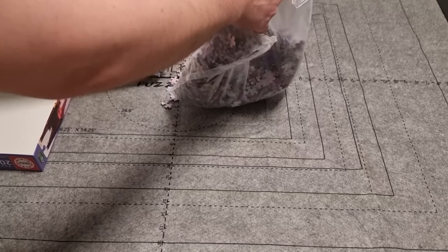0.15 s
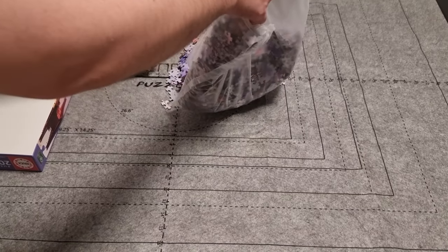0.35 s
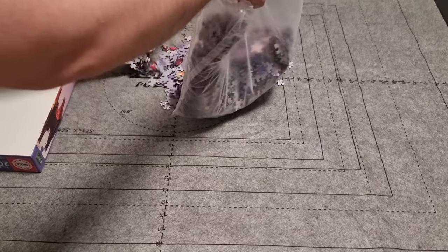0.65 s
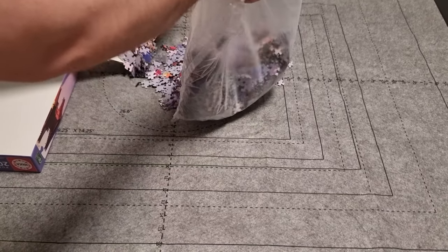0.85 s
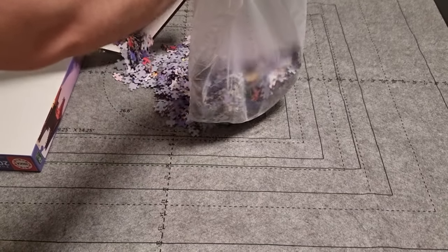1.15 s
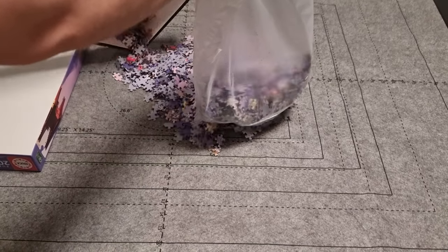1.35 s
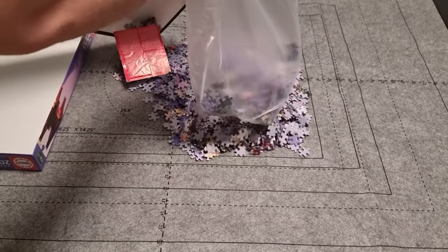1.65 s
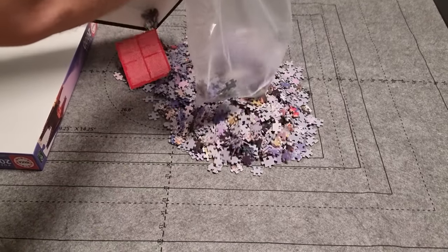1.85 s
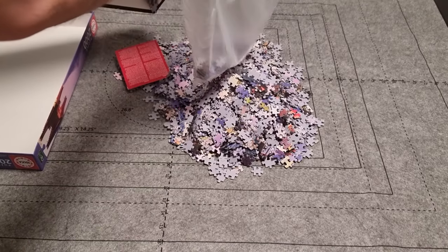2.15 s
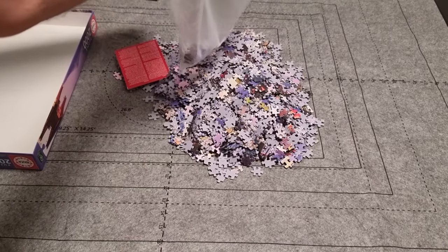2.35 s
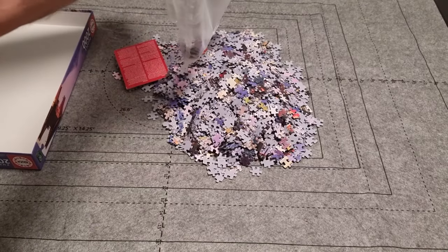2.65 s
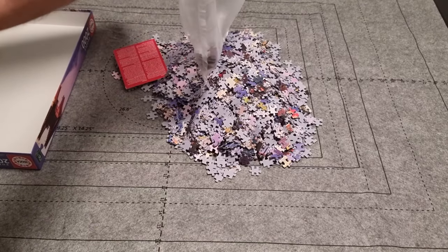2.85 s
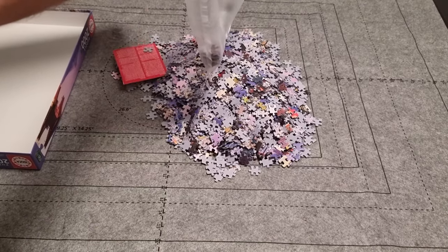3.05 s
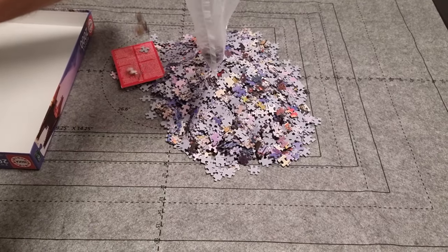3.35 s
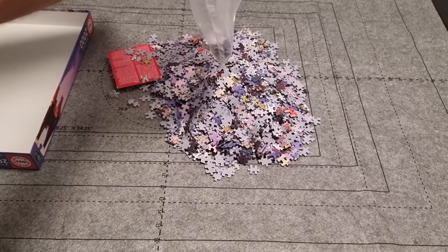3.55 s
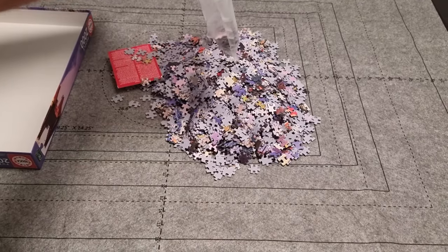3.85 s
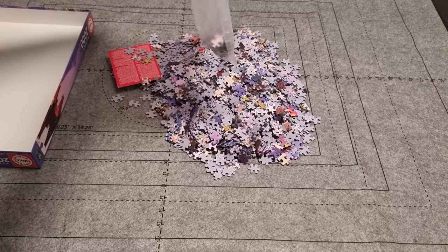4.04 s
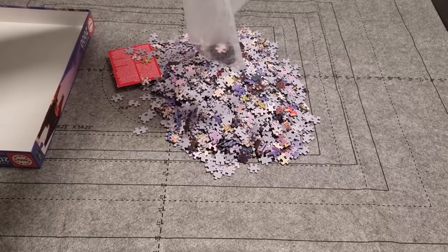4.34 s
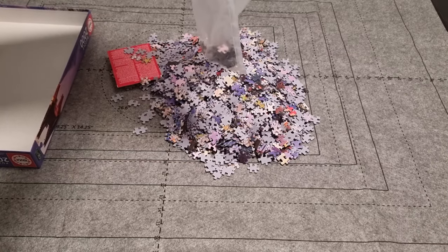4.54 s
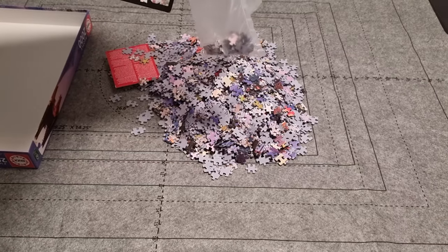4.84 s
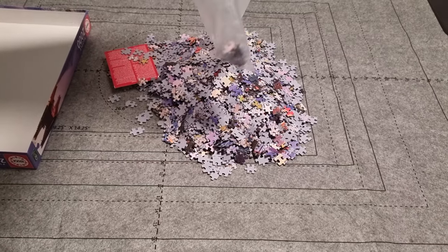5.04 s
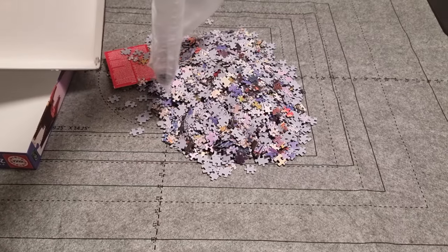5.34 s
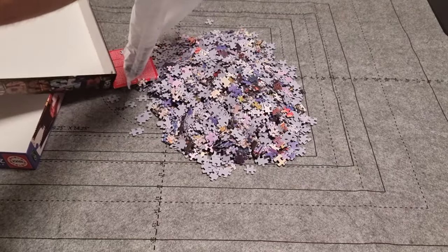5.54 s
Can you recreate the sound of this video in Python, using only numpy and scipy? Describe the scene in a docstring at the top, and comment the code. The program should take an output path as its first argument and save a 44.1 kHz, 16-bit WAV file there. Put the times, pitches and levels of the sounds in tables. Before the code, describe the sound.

Cardboard puzzle pieces pour from a crinkling plastic bag onto felt in a dense rattle, some clattering on a plastic case, ending with a hard box knock.

```python
"""Cardboard jigsaw pieces pour from a thin plastic bag onto a felt mat on a table: streams of random grains.
The jerked film crinkles and snaps in short ticks. Left of the spaced pair of microphones, a plastic case
slides out of the puzzle box early on, rings under tumbling pieces midway, and the empty box lands hard at
the end; case and box are struck resonances. Two dull drops knock on mat and pile. The small room adds a
decaying noise echo, a steady sine hum, a brief deeper drone and faint shaped noise."""
import sys
import numpy as np
from scipy import signal
from scipy.fft import rfft, irfft, next_fast_len
from scipy.io import wavfile
from scipy.ndimage import map_coordinates

SR = 44100
rng = np.random.default_rng(int(sys.argv[2]) if len(sys.argv) > 2 else 0)


def transcribe(signal):
    """Save signal, clipped to [-1, 1], as a 16-bit WAV file at the path in sys.argv[1]."""
    frames = np.atleast_2d(signal).T
    limited = np.clip(frames, -1, 1)
    pcm = np.round(limited * 32767).astype(np.int16)
    wavfile.write(sys.argv[1], SR, pcm)


N = 251370  # length [samples]

# Source levels are relative: each source adds its own offset, and the mix and room come after.
# the bag is lifted, empties, then gives up a second lot: (time [s], tumbling level [dB], crinkle level [dB])
POUR_LEVELS = [(0, -42.5, -46.5), (0.17, -47, -55), (0.56, -44, -50.5), (0.69, -40.5, -48.5),
               (1.1, -40, -50), (1.42, -44.5, -51.5), (1.75, -42, -53.5), (1.85, -47, -55),
               (2.28, -54, -64), (2.56, -56.5, -67), (2.79, -47.5, -60), (3.38, -44.5, -61),
               (3.55, -43, -46), (3.7, -47, -55), (4.08, -46, -55), (4.36, -50, -56), (4.58, -58.5, -87),
               (5.35, -70, -84)]
# the sagging bag is jerked: (time [s], tumbling level [dB], crinkle level [dB])
BAG_JERKS = [(0.695, -35.5, -48), (1.93, -41.5, -52), (4.404, -39, -49.5), (4.67, -54.5, -81),
             (4.767, -44.5, -63), (5.106, -46, -70), (5.425, -55, -90), (5.53, -61.5, -87)]
# the film buckles: (time [s], peak level [dB], treble share [dB])
FILM_SNAPS = [(0.12, -37, -13), (0.2657, -31, -16), (0.5096, -34, -27), (0.57, -28, -13), (0.5825, -34, -9),
              (1.0896, -28, -22), (1.1148, -34, -12), (1.479, -27.5, -23), (2.0965, -30.5, -19),
              (2.3527, -45, -7), (2.4073, -38, -13), (2.82, -27.5, -16), (2.982, -37, -12),
              (3.21, -31, -14), (3.6264, -25.5, -15.5), (3.7965, -25, -10), (3.925, -31, -13.5),
              (4.085, -26.5, -12), (4.1587, -31.5, -17), (4.1957, -27, -16.5), (4.376, -28, -16),
              (5.1396, -35.5, -22), (5.3846, -39, -44), (5.5784, -31, -31)]
# dull drops: a clump of pieces lands on the mat, later the plastic case falls onto the pile:
# (time [s], level [dB])
DULL_DROPS = [(0.6541, -3), (1.533, -16)]
# the case slides over the box wall in fits: (start [s], length [s], level [dB])
CASE_SLIDES = [(1.143, 0.11, -45), (1.243, 0.033, -35), (1.301, 0.0079, -36), (1.524, 0.019, -38.5),
               (1.627, 0.13, -47)]
# single pieces land on edge: (time [s], peak level [dB], contact tick [dB re peak])
PIECE_TAPS = [(2.194, -35.5, 1.5), (2.354, -37.5, 0), (2.476, -42, -1), (2.665, -35, 3.5),
              (2.834, -28.5, -8), (4.672, -39, 6), (5.067, -44.5, 0)]
# pieces tumble onto the plastic case: (time [s], peak level [dB], treble share of the contact tick [dB])
CASE_CLATTER = [(2.944, -38, -24), (3.009, -31, -15), (3.026, -24, -16.5), (3.119, -30, -28),
                (3.162, -24, -24), (3.306, -23.5, -18), (3.314, -23, -19), (3.435, -17.5, -28),
                (3.441, -17, -18), (3.471, -21, -17), (3.498, -17.5, -20)]
# the cardboard box knocks on the table: (time [s], peak level [dB], edge tick [dB re peak])
BOX_KNOCKS = [(5.599, -13.5, -2), (5.609, -12, -15), (5.622, -15.5, -16), (5.652, -20.5, -6)]
# a deeper drone that swells and fades: (time [s], level [dB])
DRONE_LEVEL = [(0, -72), (.4, -59), (1.2, -65), (1.8, -89)]

# resonances of the plastic case when a single piece lands on it: (frequency [Hz], width [Hz], level [dB])
CASE_TAP_MODES = [(1030, 350, -6.5), (2123, 86, 4.5), (3260, 190, -10)]
# resonances of the hollow plastic case: (frequency [Hz], width [Hz], level [dB])
CASE_MODES = [(1196, 20, -12), (1242, 38, -2.5), (1354, 53, -4.5), (1529, 28, -0.5), (1743, 63, -3.5),
              (1920, 73, -0.5), (2049, 67, -3), (2323, 47, -2.5), (2560, 190, -9.5), (2900, 100, -18),
              (3380, 25, -15), (3790, 84, -14), (4520, 80, -24.5)]
# resonances of the box wall, rubbed: (frequency [Hz], width [Hz], level [dB])
WALL_MODES = [(953, 80, 4), (2030, 150, -9)]
# resonances of the box panels, struck: (frequency [Hz], width [Hz], level [dB])
BOX_MODES = [(135, 56, -4), (342, 105, 4), (503, 120, 3), (750, 180, -3), (1190, 110, 1), (1570, 77, -10),
             (2150, 84, -10), (2740, 130, -7.5)]

# spectrum of a thud on the felt: (frequency [Hz], level [dB per Hz])
FELT_SPECTRUM = [(30, -23), (60, -1), (130, -6.5), (210, -6), (360, -1), (500, -2.5), (700, -9),
                 (1500, -17), (4000, -67)]
# spectrum of cardboard clicking: (frequency [Hz], level [dB per Hz])
CARD_SPECTRUM = [(100, -39), (200, -22.5), (620, -9.5), (1000, 4.5), (1300, 1.5), (1650, -4), (2150, 1),
                 (3000, -7), (4500, -10), (7000, -13.5), (9000, -37), (16000, -29)]
# spectrum of the crinkling film: (frequency [Hz], level [dB per Hz])
FILM_SPECTRUM = [(200, -27), (800, 1.5), (2000, 1.5), (3500, 6.5), (5000, -2), (7200, 5), (8800, -4.5),
                 (11000, -5), (13000, 1.5), (15800, -3.5)]
# spectrum of the room noise: (frequency [Hz], level [dB per Hz])
FLOOR_SPECTRUM = [(25, -35.5), (45, -7), (70, -4), (95, -17.5), (340, -23.5), (1000, -30.5), (5000, -41),
                  (16000, -88)]

# time for the echo to fall by 60 dB: (frequency [Hz], decay [s])
ROOM_DECAY = [(150, 0.42), (1000, 0.41), (4000, 0.37), (14000, 0.13)]
# left-right likeness of the diffuse field: (frequency [Hz], correlation [-1 to 1])
FIELD_LIKENESS = [(100, 0.79), (300, 0.84), (650, -0.32), (1300, -0.28), (2800, -0.026), (8000, -0.035)]
# the two microphones differ: (frequency [Hz], left minus right [dB])
MIC_TILT = [(150, -1), (800, 1), (1800, 0), (4400, -2.5), (6500, -2), (9500, 3.5), (13000, 1.5),
            (15800, -1)]

TOP_HZ = 15900  # the recorder's band limit
HUM_HZ = 60
SHAKE_RISE_S, SHAKE_FALL_S = 0.028, 0.058  # time constants of the rustle before and after a jerk
SLIDE_RISE_S, SLIDE_FALL_S = 0.006, 0.0069  # time constants of gripping and letting go
# lesser snaps: rate, peak over the film level, scatter either way, treble share
CREASES_PER_S, CREASE_DB, CREASE_SPREAD_DB, CREASE_TREBLE_DB = 14, 17, 6, -24
TAP_TREBLE_DB = -25  # treble share of a landing piece's tick
CLATTER_TICK_DB = -1.5  # the tick of the contact itself, relative to the blow


def amp(db):
    """Decibels to amplitude."""
    return 10 ** (np.asarray(db) / 20)


def unit(x):
    """x at rms 1."""
    return x / np.sqrt(np.mean(x ** 2) + 1e-20)


def along(points, hz):
    """(Hz, value) points read on a log frequency axis."""
    f, v = np.transpose(points)
    return np.interp(np.log(hz + 1), np.log(f + 1), v)


def curves(rows):
    """One value per sample for each column after the time."""
    s, *columns = np.transpose(rows)
    t = np.arange(N) / SR
    return [np.interp(t, s, column) for column in columns]


def wobble(rate):
    """A smooth random curve, rate knots a second."""
    knots = rng.standard_normal(int(N * rate / SR) + 4)
    return map_coordinates(knots, [np.arange(N) * rate / SR])


def swell(start_s, hold_s, rise_s, fall_s):
    """The gain of one gesture: it rises to 1, holds and dies away."""
    t = np.arange(N) / SR - start_s
    before = np.minimum(t, 0)
    after = np.maximum(t - hold_s, 0)
    return np.exp(before / rise_s - after / fall_s)


def filtered(x, response):
    """x times a response of frequency."""
    m = next_fast_len(N + SR // 2)
    spectrum = rfft(x, m) * response(np.fft.rfftfreq(m, 1 / SR))
    return irfft(spectrum, m)[..., :N]


def click(spectrum, size=2048):
    """The shortest causal pulse with this spectrum (minimum phase), energy 1."""
    level_db = along(spectrum, np.fft.rfftfreq(size, 1 / SR))
    cepstrum = irfft(np.log(amp(level_db)))
    cepstrum[1:size // 2] *= 2
    cepstrum[size // 2 + 1:] = 0
    pulse = irfft(np.exp(rfft(cepstrum)))
    return pulse / np.linalg.norm(pulse)


def ring(modes, size=8192):
    """A struck body's answer: damped resonances of alternating sign, energy 1."""
    f = np.fft.rfftfreq(size, 1 / SR)
    response = 0
    for k, (centre, width, db) in enumerate(modes):
        damping = 1j * f * width
        response = response + (-1) ** k * amp(db) * damping / (centre * centre - f * f + damping)
    pulse = irfft(response)
    return pulse / np.linalg.norm(pulse)


def scuff(spectrum, life_s, size=512):
    """One kind of grain: rough surfaces chatter for a moment, with random peaks and dips in the spectrum."""
    chatter = rng.standard_normal(size) * np.exp(-np.arange(size) / SR / life_s)
    pulse = signal.fftconvolve(chatter, click(spectrum))
    return pulse / np.linalg.norm(pulse)


def through(x, pulse):
    """Every impulse in x sounds the pulse."""
    return signal.oaconvolve(x, np.atleast_2d(pulse), axes=1)[:, :N]


def contacts(times, sizes, lag_s):
    """Stereo impulses of random polarity; each has its own place and reaches one microphone first."""
    lag, sign = rng.uniform(-1, 1, (len(times), 2)).T
    signed = sizes * np.sign(sign)
    channels = []
    for side in (-1, 1):
        arrival = np.round((times + side * lag * lag_s / 2) * SR)
        at = np.clip(arrival, 0, N).astype(int)
        channels.append(np.bincount(at, signed, N + 1)[:N])
    return np.array(channels)


def grains(rate, spread_db, lag_s):
    """A stream of random contacts of scattered size, rms 1."""
    when, size = rng.random((int(rate * N / SR), 2)).T
    size_db = spread_db * np.minimum(-np.log(1 - size), 4)
    return unit(contacts(when * N / SR, amp(size_db), lag_s))


def stream(level_db, spectrum, rate, spread_db, life_s, count):
    """Grains of several differently coloured kinds under one level curve."""
    gain = amp(level_db) / np.sqrt(count)
    total = 0
    for _ in range(count):
        impulses = grains(rate / count, spread_db, lag_s=0.0005) * gain
        total = total + through(impulses, scuff(spectrum, life_s))
    return total


def bursts(times, db, length, follow_db, lag_s, count):
    """For each event a leading contact and a flurry that thins and dies, of total energy db."""
    delay = rng.exponential(1, (len(times), count)) ** 1.5
    delay[:, 0] = 0
    sizes = amp(follow_db + 2 * rng.standard_normal(delay.shape)) / np.sqrt(1 + delay)
    sizes[:, 0] = 1
    sizes *= (amp(db) / np.linalg.norm(sizes, axis=1))[:, None]
    when = times[:, None] + delay * length
    return contacts(when.ravel(), sizes.ravel(), lag_s)


def crackle(s, db, treble_db):
    """Short dry ticks, each a dull body and a sharp edge."""
    body = bursts(s, db + 14.5, length=0.002, follow_db=6.0, lag_s=0.0006, count=20)
    edge = bursts(s, db + treble_db + 30, length=0.0018, follow_db=3, lag_s=0.0005, count=16)
    dull = click([(300, -10.5), (1200, -1.0), (3200, 1.5), (5000, 1.0), (7200, 0), (9000, -15), (16000, -21.5)])
    sharp = click([(2000, -45), (7000, -22.5), (10000, -1.5), (13500, 5.5)])
    return through(body, dull) + through(edge, sharp)


def effort():
    """Levels in dB of tumbling pieces and of crinkling film: the steady pour plus a surge for every jerk."""
    surges = 0
    for s, *levels_db in BAG_JERKS:
        surges = surges + np.outer(amp(levels_db), swell(s, 0, SHAKE_RISE_S, SHAKE_FALL_S))
    steady = amp(curves(POUR_LEVELS))
    return 20 * np.log10(np.hypot(steady, surges))


def pieces():
    """Pieces slide in small avalanches, clicking on each other and pattering on the felt."""
    flow_db = effort()[0] + 2.12 * wobble(40)
    clicks = stream(flow_db - 2.0, CARD_SPECTRUM, rate=400, spread_db=3, life_s=0.00068, count=8)
    patter = stream(flow_db - 10, FELT_SPECTRUM, rate=500, spread_db=2.5, life_s=0.0005, count=3)
    return clicks + patter


def bag():
    """The film crinkles finely all along; creases that pop through give short bright crackles."""
    film_db = effort()[1]
    crinkle_db = film_db + 4.0 + 2.2 * wobble(55)
    crinkle = stream(crinkle_db, FILM_SPECTRUM, rate=2200, spread_db=3.0, life_s=0.0005, count=6)
    when, size = rng.random((int(CREASES_PER_S * N / SR), 2)).T  # each from 0 to 1
    crease_db = film_db[(when * N).astype(int)] + CREASE_DB + CREASE_SPREAD_DB * (2 * size - 1)
    creases = [(s, db, CREASE_TREBLE_DB) for s, db in zip(when * N / SR, crease_db)]
    s, db, treble_db = np.vstack([FILM_SNAPS, creases]).T
    return crinkle + crackle(s, db, treble_db)


def background():
    """Mains hum and a deeper drone, sines that waver slightly, over faint shaped noise."""
    t = np.arange(N) / SR
    hum = amp(-55.0 + 0.6 * wobble(1.5)) * np.sin(2 * np.pi * HUM_HZ * t)
    drone = amp(curves(DRONE_LEVEL)[0]) * np.sin(2 * np.pi * 48.5 * t + 0.2 * wobble(2))
    field = diffuse(rng.standard_normal((2, N)))
    air = unit(filtered(field, lambda hz: amp(along(FLOOR_SPECTRUM, hz))))
    return np.sqrt(2) * (hum + drone) + amp(-59.5) * air  # sqrt(2) makes the sine levels rms


def dull_drops():
    """A clump of pieces lands on the mat, later the case falls onto the pile: few contacts, a dull knock."""
    s, db = np.transpose(DULL_DROPS)
    blow = bursts(s, db, length=0.003, follow_db=-9, lag_s=0.00056, count=4)
    knock = click([(60, -30), (130, -19), (210, 3.5), (320, -2.5), (700, -3), (1250, -0.5),
                   (1700, -11), (9000, -34)])
    return through(blow, knock)


def case():
    """The hollow case ticks and rings under tumbling pieces; sliding, it rubs the box wall into a short rasp."""
    pressure = 0
    for start, length, level_db in CASE_SLIDES:
        pressure = pressure + amp(level_db) * swell(start, length, SLIDE_RISE_S, SLIDE_FALL_S)
    rub = grains(rate=970, spread_db=4.5, lag_s=0.00047) * pressure
    rasp = through(rub, ring(WALL_MODES))

    s, db, treble_db = np.transpose(CASE_CLATTER)
    blows = bursts(s, db + 18.0, length=0.005, follow_db=-3.5, lag_s=0.00044, count=12)
    ticks = crackle(s, db + CLATTER_TICK_DB, treble_db)
    ringing = through(blows, ring(CASE_MODES))
    card_clicks = amp(-5.5) * through(blows, click(CARD_SPECTRUM))
    return ticks + ringing + card_clicks + rasp


def taps():
    """A piece that lands on its edge ticks, sets the case ringing briefly and rocks flat."""
    s, db, tick_db = np.transpose(PIECE_TAPS)
    rocking = bursts(s, db + 20.0, length=0.0027, follow_db=-8, lag_s=0.0002, count=3)
    return through(rocking, ring(CASE_TAP_MODES)) + crackle(s, db + tick_db, TAP_TREBLE_DB)


def box():
    """The box lands edge by edge: its panels boom, the table thuds and the rim chatters."""
    s, db, tick_db = np.transpose(BOX_KNOCKS)
    blows = bursts(s, db + 19.5, length=0.004, follow_db=-3.5, lag_s=0.00062, count=5)
    rim = bursts(s, db + tick_db + 20.5, length=0.004, follow_db=9, lag_s=0.0005, count=16)
    edge = click([(40, -30), (200, -7), (1200, 2.0), (2800, -5.0), (4500, -12), (7200, -19.5),
                  (9500, -40), (14000, -32)])
    boom = through(blows, ring(BOX_MODES))
    thud = amp(-6.5) * through(blows, click(FELT_SPECTRUM))
    return boom + thud + through(rim, edge)


def from_left(x, lag_s):
    """A source on the left reaches the right microphone later."""
    late = np.pad(x[1], (round(abs(lag_s) * SR), 0))[:N]
    return np.array([x[0], late])


def diffuse(pair):
    """Two unrelated signals become a field arriving from all sides at two spaced microphones."""
    def mid_side_gains(hz):
        turn = np.arccos(np.clip(along(FIELD_LIKENESS, hz), -1, 1)) / 2
        return np.array([np.cos(turn), np.sin(turn)])

    mid, side = filtered(pair, mid_side_gains)
    return np.array([mid + side, mid - side])


def room(x, early_db, early_s):
    """Strong first echoes off table and walls, then a tail that dies sooner in the treble."""
    hz, t, noise = signal.stft(rng.standard_normal((2, SR // 2)), SR, nperseg=256)
    fall = amp(-60 * t / along(ROOM_DECAY, hz)[:, None])
    early = 1 + amp(early_db) * np.exp(-t / early_s)
    tail = signal.istft(noise * fall * early, SR, nperseg=256)[1]
    tail = np.pad(tail, ((0, 0), (SR // 500, 0)))  # the echo starts 2 ms after the direct sound
    return diffuse(through(x, tail / np.linalg.norm(tail[0])))


def scene():
    """Each group of sources gets its own answer from the room; case and box stand on the left."""
    on_mat = pieces() + dull_drops() + taps()
    on_left = from_left(case() + box(), lag_s=0.0007)  # a path about 24 cm longer to the right
    sources = [on_mat, bag(), on_left]
    wet = sum(room(x, early_db=0.5, early_s=0.0058) for x in sources)
    return amp(-1.0) * sum(sources) + amp(-1.5) * wet + background()


def record(dry):
    """Two slightly unlike microphones and the recorder's band limit."""
    def response(hz):
        tilt_db = np.outer([0.5, -0.5], along(MIC_TILT, hz))
        return amp(tilt_db) * (hz < TOP_HZ)

    return filtered(dry, response)


dry = scene()
out = record(dry)
transcribe(out)
```